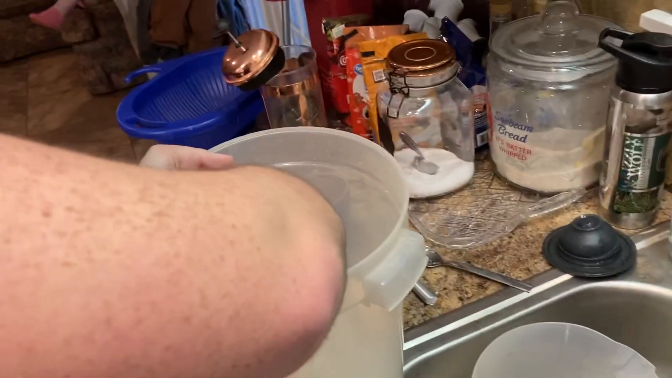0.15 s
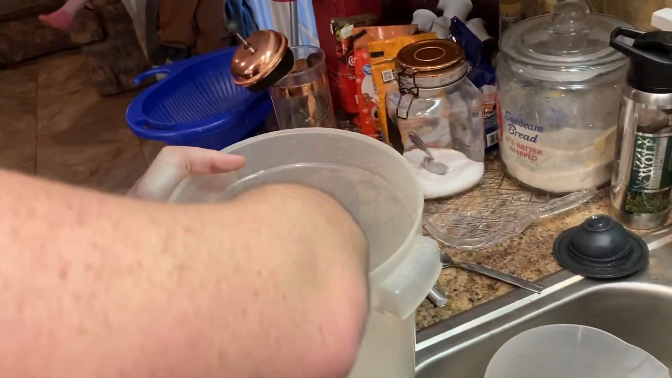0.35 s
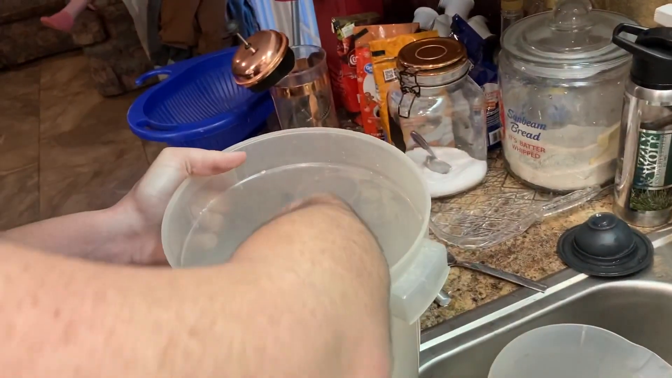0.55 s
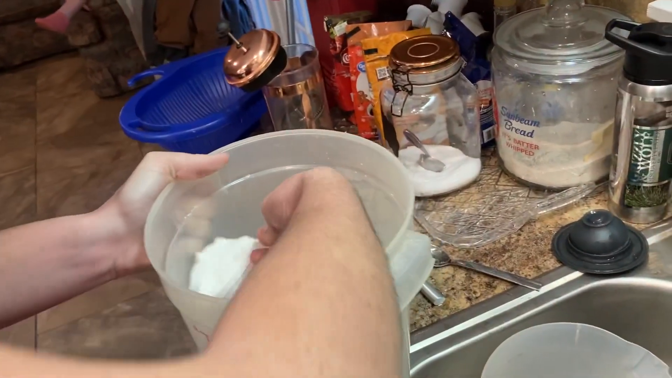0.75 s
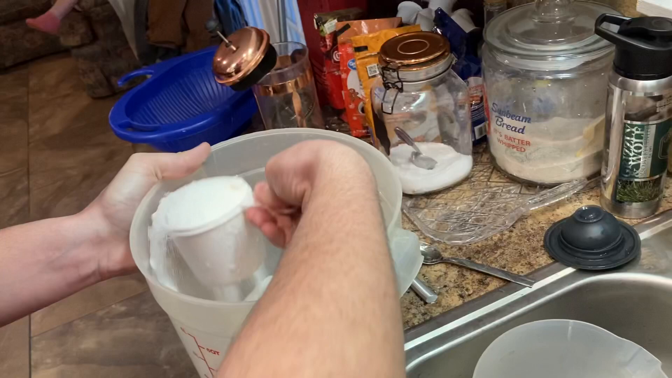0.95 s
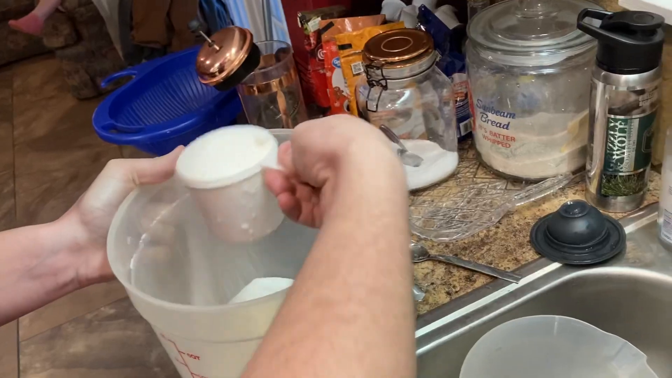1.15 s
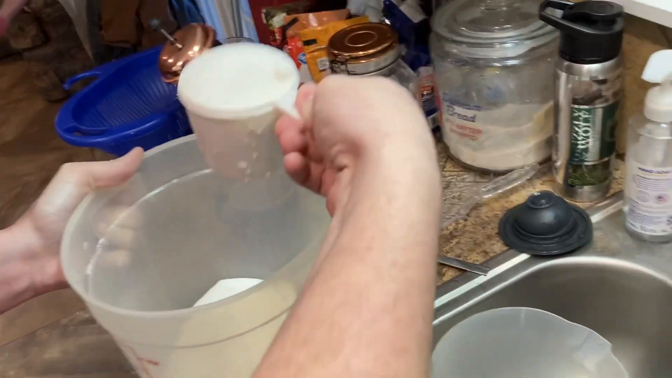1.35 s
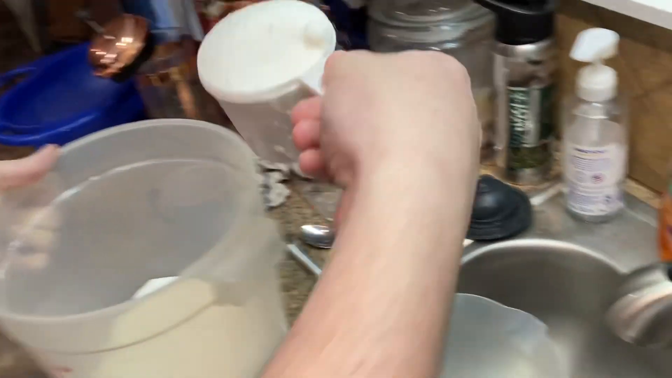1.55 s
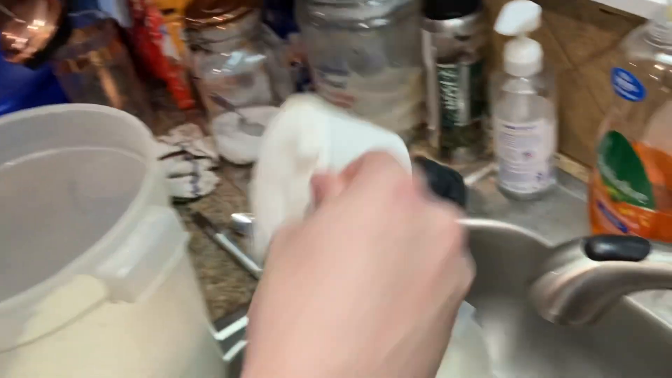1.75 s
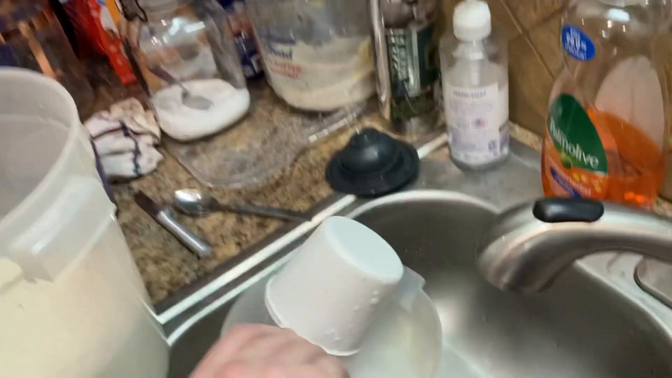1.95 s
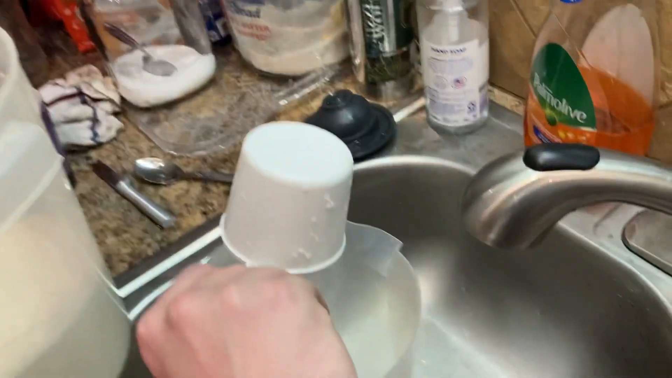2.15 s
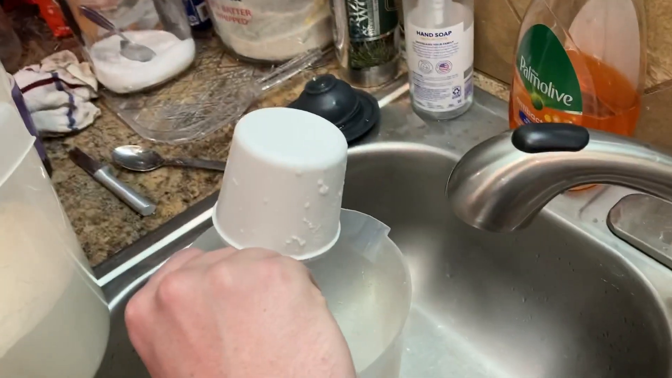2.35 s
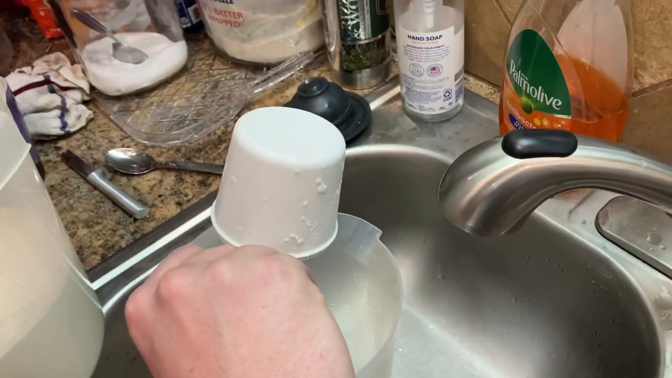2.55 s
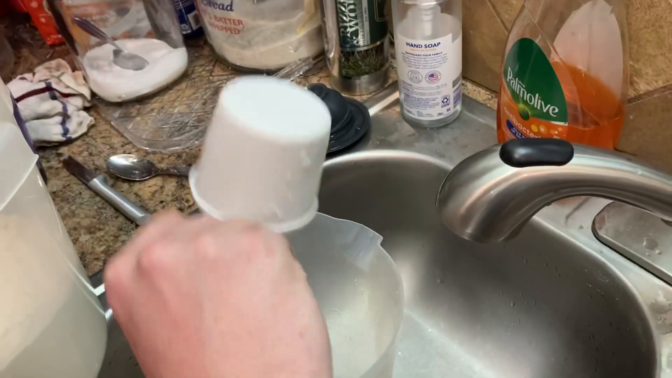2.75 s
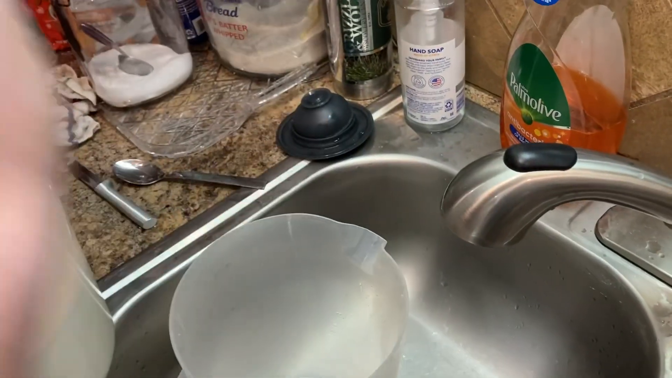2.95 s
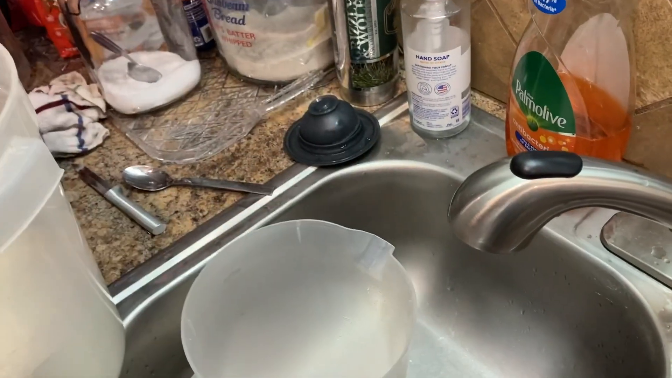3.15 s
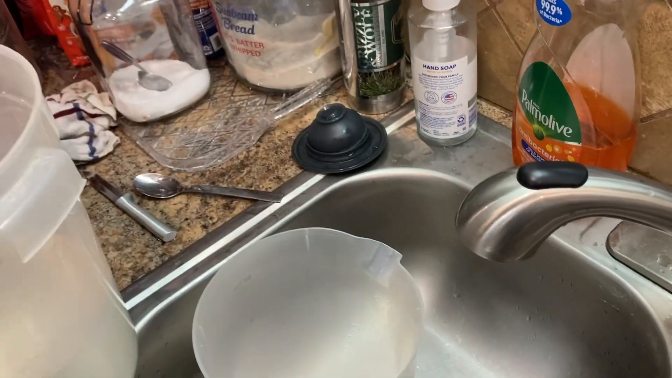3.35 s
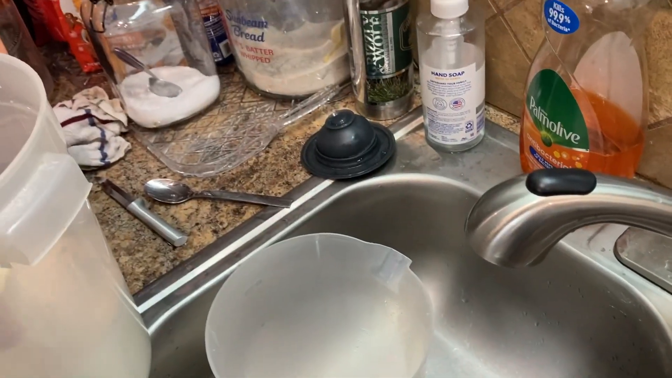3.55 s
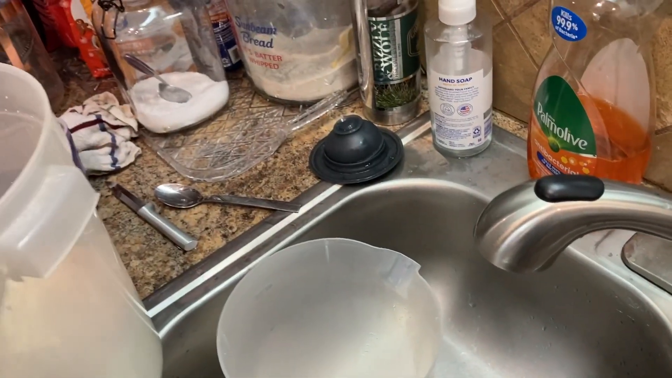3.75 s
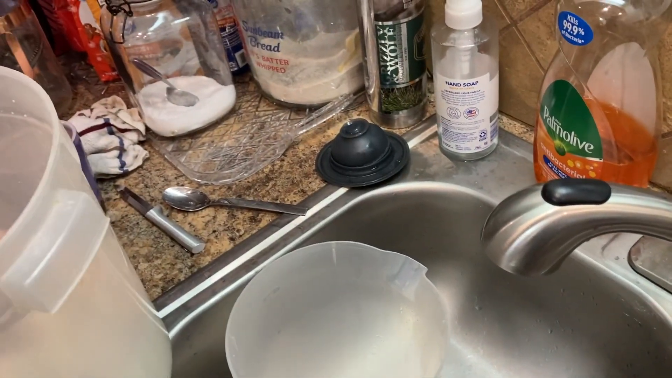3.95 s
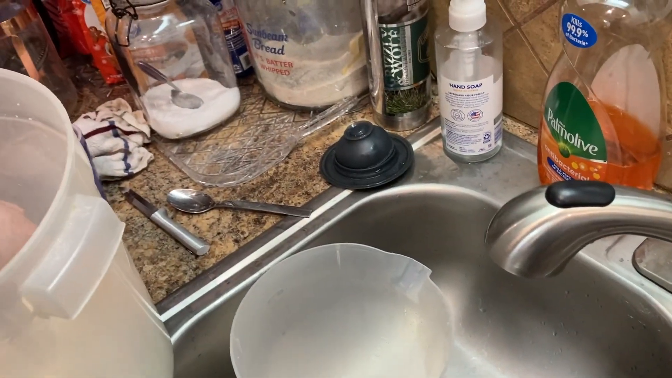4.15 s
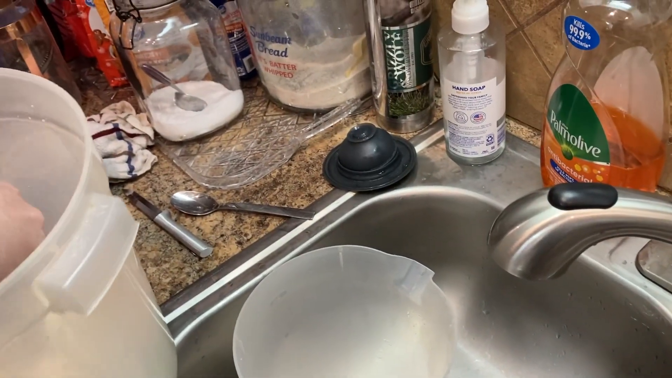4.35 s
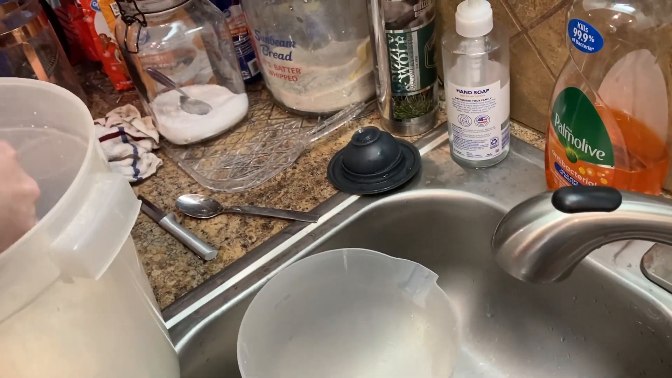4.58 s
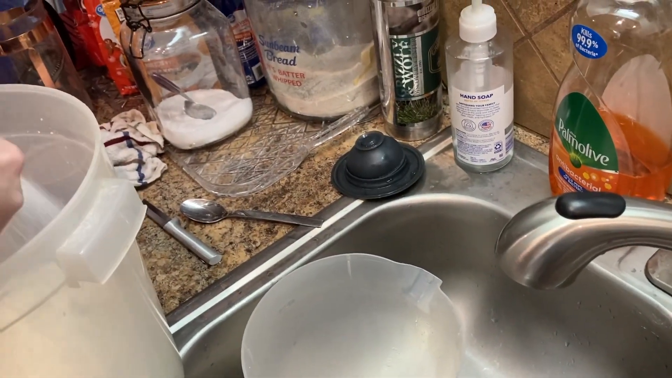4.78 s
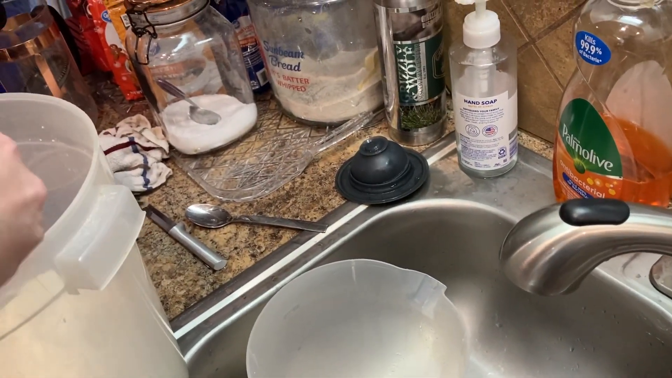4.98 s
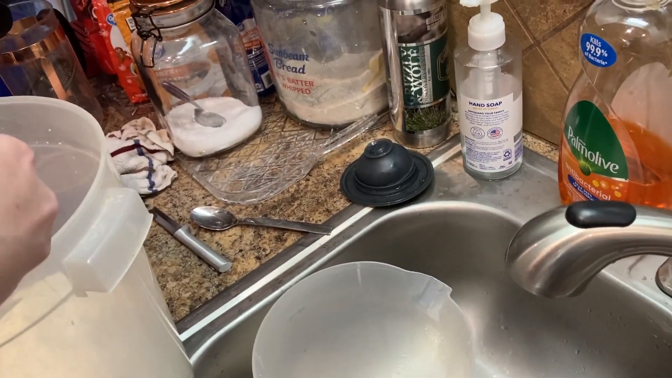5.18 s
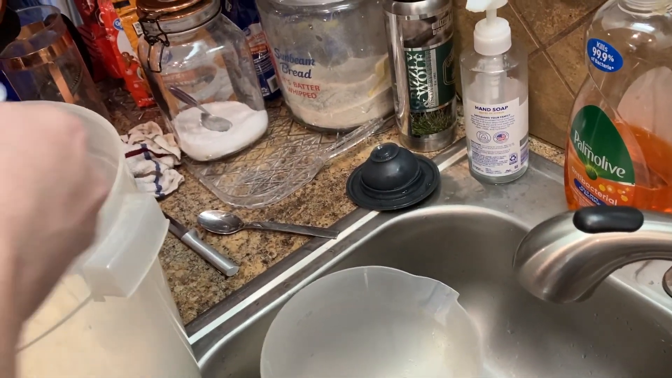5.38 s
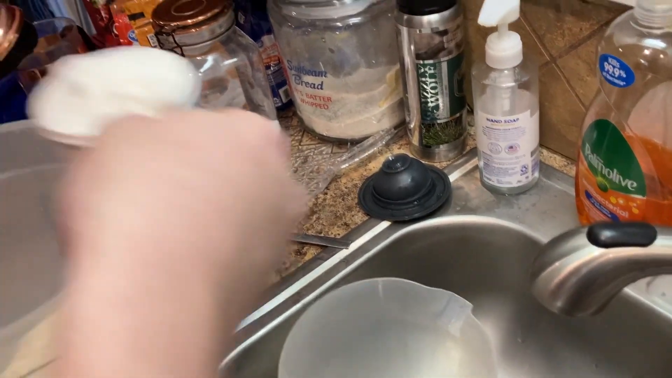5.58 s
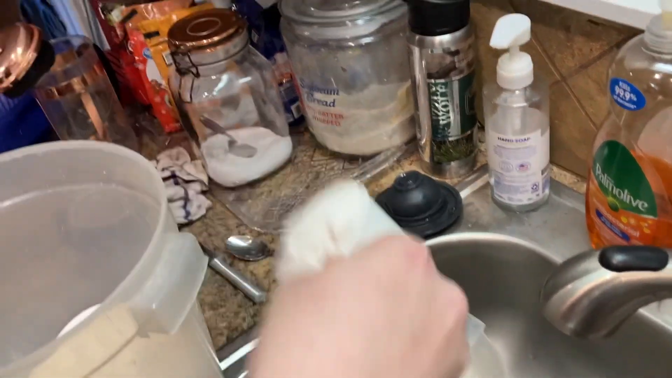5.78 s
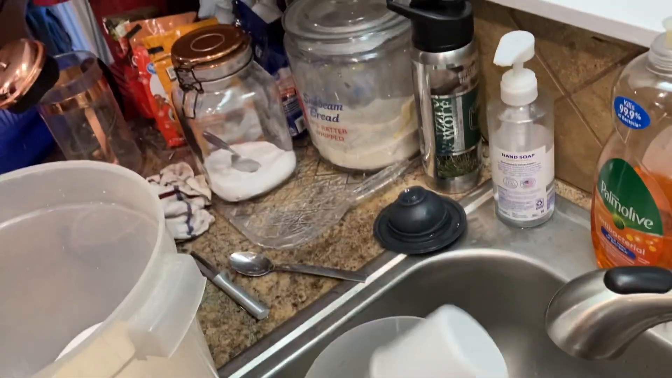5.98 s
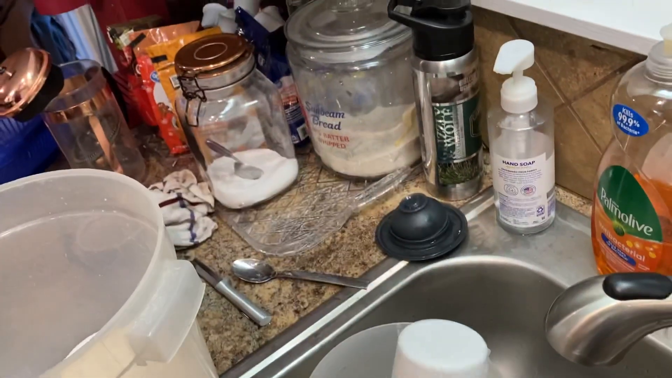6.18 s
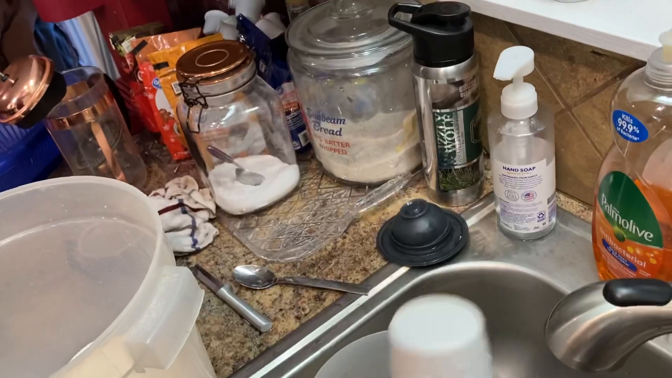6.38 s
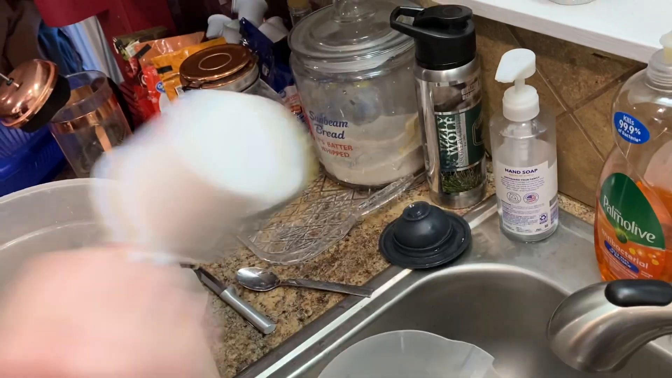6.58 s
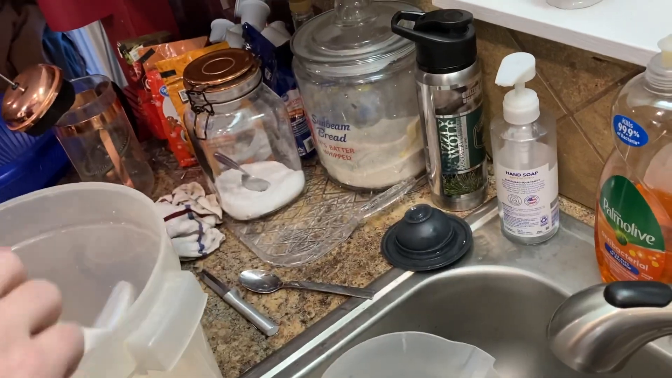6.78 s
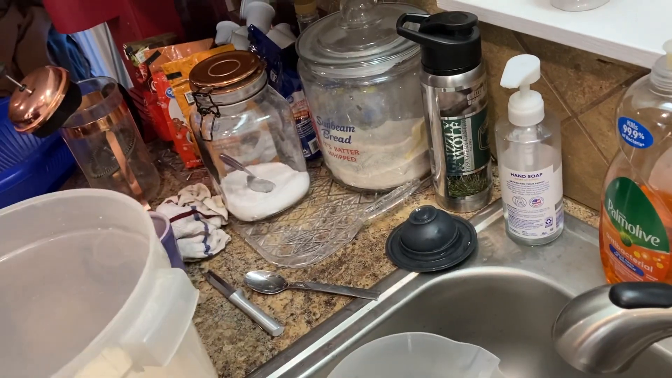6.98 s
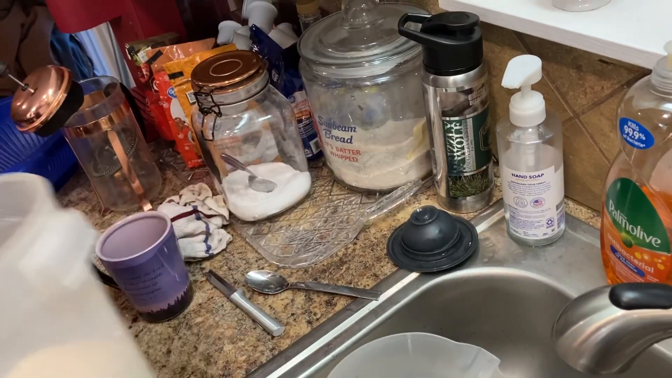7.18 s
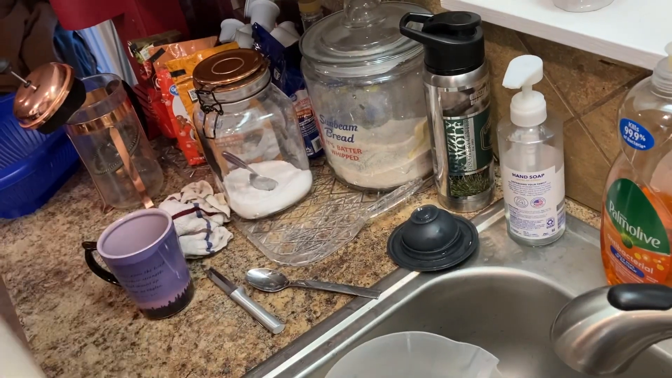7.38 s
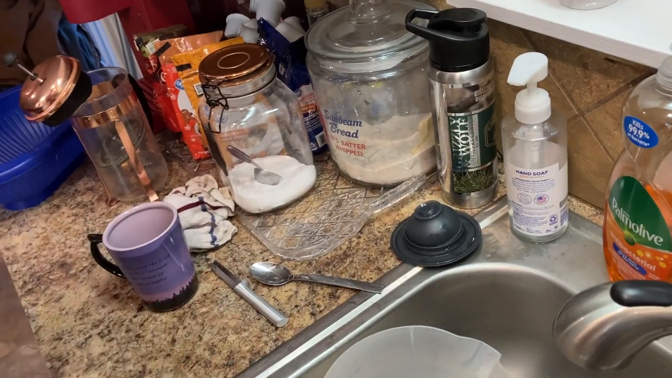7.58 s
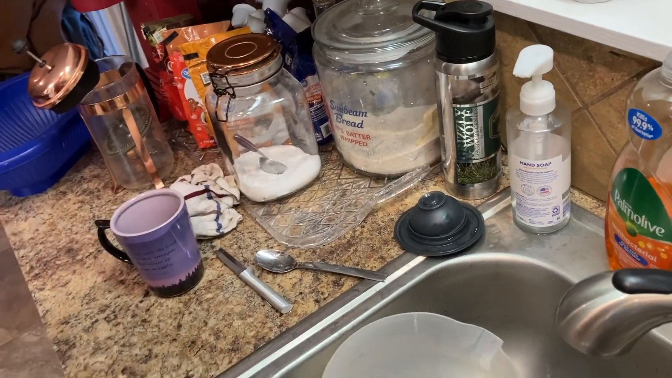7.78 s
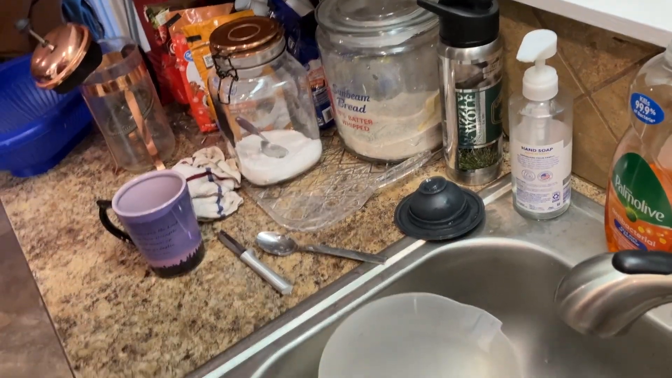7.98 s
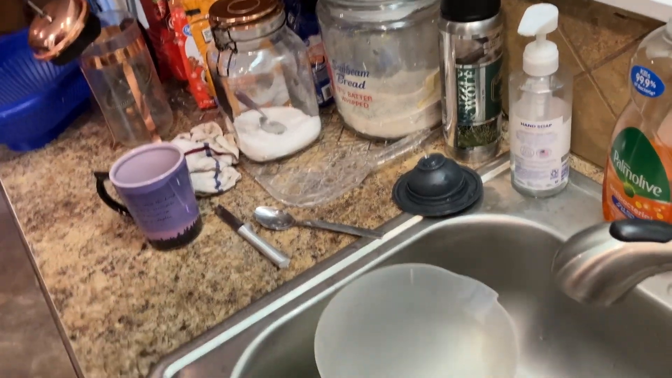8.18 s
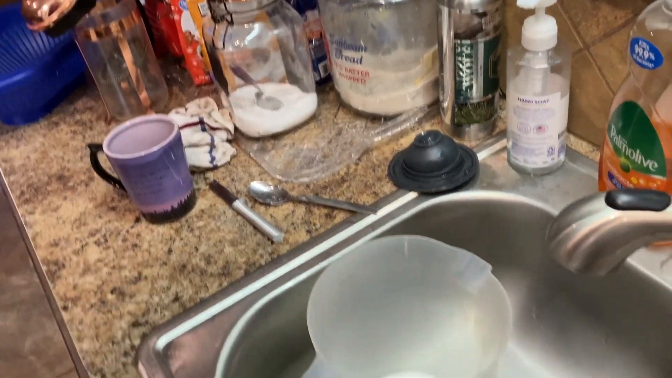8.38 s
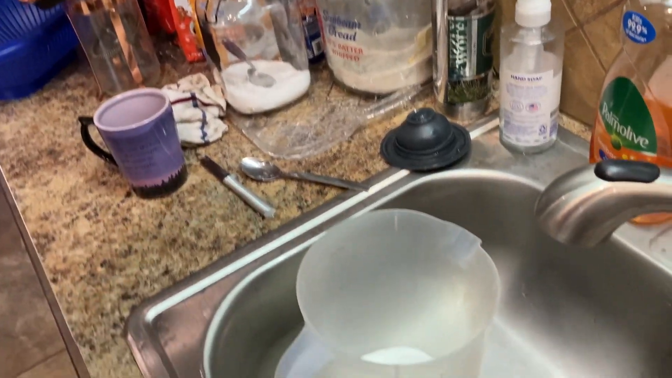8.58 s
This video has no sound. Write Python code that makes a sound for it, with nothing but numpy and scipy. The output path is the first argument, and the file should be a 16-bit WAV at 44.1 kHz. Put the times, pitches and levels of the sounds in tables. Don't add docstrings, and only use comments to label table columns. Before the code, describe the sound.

Granulated sugar hisses and crunches around a plastic cup, first with a bright digging rush, then knocks and a pour. The cup returns to the tub for more scraping, ending in a sharp clack and low thud. After a quiet gap comes a short tip-out, then a loud rapid clatter on hollow plastic. Finally the pitcher is lightly bumped and shaken. Faint refrigerator hum and short kitchen echoes surround the close stereo sound.

```python
import sys
import numpy as np
from scipy import signal
from scipy.fft import rfft, irfft, next_fast_len
from scipy.io import wavfile
from scipy.ndimage import uniform_filter1d, map_coordinates

SR = 44100
rng = np.random.default_rng(int(sys.argv[2]) if len(sys.argv) > 2 else 0)


def wrap_up_sound(samples):
    columns = np.atleast_2d(samples).T
    tamed = np.clip(columns, -1, 1)
    steps = np.round(tamed * 32767).astype(np.int16)
    wavfile.write(sys.argv[1], SR, steps)


def decibels_to_gain(level_db):
    exponent = np.asarray(level_db, float) / 20
    return 10 ** exponent


N = 380578

# t/s, hiss level/dB,
# time to fall 20 dB/s, dullness/dB
SPILLS = [(.004, -56, -0.23, 2), (.484, -28.5, 0.1077, -14), (1.04, -57.5, 0.2, -2),
          (1.201, -34.5, 0.094, -2), (2.21, -38.5, 0.04, -14), (2.43, -32, 0.12, -3),
          (2.856, -72, 0.05, 2.5), (3.0, -76, 1, 7.5), (3.243, -36.5, 0.12, -8), (4.299, -43.5, 0.1, 5.5),
          (4.396, -50, 0.08, 10.5), (4.47, -57, .1, 8), (4.515, -55, .04, 9), (4.568, -49, .035, -20),
          (4.6, -70.5, 0.46, -6), (5.033, -49, .09, -1), (5.975, -42, .15, -4.5), (6.124, -54.5, 0.08, -2),
          (6.642, -41.5, -0.0431, 12.5), (6.703, -46.5, 0.09, 13), (6.814, -56.5, 0.274, 17),
          (6.95, -69, .35, -6),
    (8.222, -56, .25, 4),
]
# peak t/s, hiss level/dB, time to rise 20
# dB/s, time to fall 20 dB/s, dullness/dB
STROKES = [(0.171, -47, 0.09, .16, 2.5), (0.441, -44.5, .17, .1, -4), (0.691, -43.5, 0.23, 0.08, -2.5),
           (.9, -64, 1.2, 0.2, 0.5), (1.46, -74, 0.26, 0.3, 19), (1.59, -58, .1, 0.14, 12.5),
           (1.8, -57, 0.1, 0.56, -16), (1.894, -41.5, 0.0348, 0.1239, -10), (2.046, -49, 0.1, 0.04, 5),
           (2.115, -55.5, .04, 0.07, 0.5), (3.364, -39, 0.0575, 0.11, 3.5),
           (3.45, -39.5, 0.1227, 0.27, -11), (3.58, -47, 0.26, 0.37, -14), (3.74, -43.5, 0.2654, 0.04, -9),
           (3.95, -53, .2, 0.06, 4), (4.14, -44, 0.25, 0.27, -0.5), (4.27, -44, 0.16, 0.1, 0.5),
           (5.45, -78, 0.2, -0.07, 7), (5.54, -80.5, 0.4, 0.6, 10), (5.87, -53.5, 0.04, 0.08, -14),
           (5.96, -49.5, 0.05, 0.11, -20), (6.191, -49.5, -0.06, -0.06, -10), (6.637, -48, .022, -0.02, 14),
           (6.728, -31.5, 0.0373, 0.0479, -10.5), (6.8, -45.5, 0.04, 0.1441, 5),
           (8.33, -52, .12, .1, 5),
    (8.593, -53, .02, .03, 2),
]
# peak t/s, scrape level/dB, time
# to rise 20 dB/s, time to fall 20 dB/s
RUBS = [(.12, -53, 0.18, 0.44), (.51, -43, 0.17, 0.16), (.82, -55.5, 0.3, .2), (1.3, -46.5, .1, 0.3),
        (1.47, -47.5, 0.1, 0.26), (1.598, -43, 0.12, 0.11), (2.221, -43, 0.04, -0.02),
        (2.47, -42, 0.04, 0.15), (3.1, -67.5, -0.5, 2.5), (3.259, -46, 0.01, 0.14),
        (3.56, -37.5, 0.14, 0.19), (3.69, -40.5, 0.07, 0.04), (3.86, -56, 0.16, -0.27),
        (3.95, -49, 0.3, 0.03), (4.15, -48, 0.36, 0.14), (4.41, -41.5, -0.13, 0.02), (4.5, -46, .06, 0.01),
        (5.5, -62, -0.4, -0.56), (6.638, -38, -0.04, -0.17), (6.665, -30, -0.01, -0.0473),
        (6.73, -31.5, -0.0026, -0.0064),
        (7.02, -60, .1, .15),
    (8.33, -38, .1, .08),
    (8.592, -43, .012, .025),
]
RUB_LEVELS = [-21, -9.5, -1]
# level/dB, share of the dullness, lingers longer by (times)
LAYERS = [(1, 0.021, 1.006), (-0.33, 0.64, 0.99), (-5, 0.85, 0.65)]
SPILL_RISE_S, STROKE_ROUND = .011, 1.42

# f/Hz, level per Hz/dB
HISS = [(3000, -23), (4500, -10), (6000, -3.5), (7500, -2), (10000, -0.5), (13000, -11), (16000, -11)]
# f/Hz, width/Hz, level/dB
CRUNCH_MODES = [(1900, 836, -2), (2400, 1160, 1.5), (3072, 2070, -2.5), (4610, 2400, -11.5)]
# f/Hz, width/Hz, level/dB
SCRAPE_MODES = [(278, 130, -3.5), (580, 270, -4.5), (866, 150, 0.5), (1250, 500, -6.5)]

# t/s, level/dB, strongest mode f/Hz, t60/s
ON_CUP = [
    (1.2, -40.5, 2275, 0.4),
    (2.424, -36.5, 2300, 0.3),
    (3.87, -51.5, 2050, 0.97),
]
# t/s, level/dB, strongest mode f/Hz, t60/s
ON_RIM = [
    (.745, -53, 2240, 0.49),
    (1.044, -62, 2230, 0.4),
    (3.51, -50, 2940, 0.67),
    (3.642, -48.5, 2820, .4),
    (3.7, -49, 2450, 0.31),
    (3.97, -50, 2110, .9),
    (4.075, -43, 2120, 0.68),
    (4.17, -46.5, 2220, 0.92),
    (5.032, -47, 2400, 0.088),
]
# t/s, level/dB, strongest mode f/Hz, t60/s
ON_FLOOR = [
    (1.205, -50, 984, 0.29),
    (1.535, -45, 1005, 0.6),
    (2.43, -49, 1050, .36),
    (3.46, -43.5, 900, 0.72),
    (3.53, -38.5, 1012, 0.45),
    (4.45, -54, 900, 0.5),
    (6.645, -34, 903, 0.23),
    (8.237, -42, 1026, 0.34),
    (8.312, -37, 1070, .19),
]
# t/s, level/dB, strongest mode f/Hz, t60/s
ON_WALL = [
    (.12, -48.5, 1546, 1),
    (0.489, -39, 2626, 0.36),
    (.56, -51, 1500, 1),
    (1.535, -43.5, 1815, .45),
    (3.398, -30, 1500, 0.088),
    (5.49, -66, 1503, .45),
    (5.972, -47.5, 1900, 0.1),
]
OTHER_MODES = [
    [.435, 1.49],
    [1.12, 1.3],
    [1.2, 1.2],
    [1.26, .6],
]

# t/s, peak level/dB, ring f/Hz, body re peak/dB, treble re peak/dB
KNOCKS = [(.673, -28.5, 1510, -11.5, 3.5), (1.204, -23, 2400, -26, -1), (1.5366, -42, 2440, -8, -5),
          (1.5978, -45, 1844, -8.5, -8), (2.0668, -26.5, 1630, -39, -2.5), (2.2046, -27.5, 1480, -1, 2),
          (3.236, -31.5, 2610, -26, -5), (3.3577, -33, 2470, -14, -1), (3.4052, -31, 1470, 1, 0),
          (5.04, -55, 2400, -19.5, -4), (4.2935, -17.5, 2490, -12.5, -5), (4.3955, -41, 1566, 9, -8.5),
          (5.9699, -30, 2000, 1, 0), (6.6385, -12.5, 2060, -2.5, -6), (6.6477, -12.5, 2070, -3.5, -5),
          (6.7, -10, 2027, -9, -1), (6.7293, -24.5, 2100, -11, 1.5), (6.8112, -9.5, 2234, -16.5, -2),
          (8.2412, -36.5, 1760, -1.5, -4), (8.375, -41.5, 1830, 8.5, -8), (8.587, -42.5, 1650, -10, -2)]
# t/s, peak level/dB, ring f/Hz
TICKS = [(0.7448, -35, 1640), (0.9018, -43.5, 1740), (1.921, -41, 1900), (1.98, -43, 2630),
         (2.007, -34, 2400), (2.047, -40, 1900), (2.1241, -44, 2220), (3.564, -35, 2880),
         (3.809, -40, 2530), (4.5686, -43, 2140), (5.6988, -65.5, 2340), (5.7695, -54, 1710),
         (5.8565, -48, 2550), (6.001, -41, 2200), (6.123, -39, 2930), (6.1863, -46.5, 1710),
         (6.4172, -58.5, 2260), (6.5689, -49, 3174), (6.5739, -55, 2600)]
# multiple of the ring pitch, level/dB
CUP_OVERTONES = [(0.679, -14), (1, -3.5), (1.36, -16.5), (1.73, -13.5), (2.2, -12.5), (2.7, -16.5),
                 (3.25, -15)]
KNOCK_T60, TICK_T60 = 0.053, .04
TICK_BODY_DB, TICK_TREBLE_DB, TICK_RING_DB, KNOCK_RING_DB = -20, -1.5, -9, -3
SNAP_DB, SNAP_T60 = 8, .006
TREBLE_T60_SHARE = .65
CUP_WANDER_HZ = 200

# (f/Hz, width/Hz, level/dB)
JOLTS = [
    (.483, -35, 0.36, [(940, 46, -9), (1406, 84, -9), (2700, 70, -6), (3230, 46, -13), (3840, 24, 3), (4810, 53, -7), (6030, 95, -5.5), (6500, 52, -3), (7240, 100, 0.5), (7540, 49, -11)]),
    (.672, -41, 0.056, [(1020, 73, 0), (5940, 150, -5), (6500, 140, 2), (7450, 170, -8)]),
    (.68, -46.5, 0.25, [(1584, 56, 1.5), (2730, 33, 2.5), (3780, 25, -9)]),
    (1.201, -38, .45, [(1051, 126, -1.5), (1910, 33, -6.5), (2296, 54, -1.5), (3550, 110, 0), (3940, 46, -14), (4250, 33, -10)]),
         (6.816, -44, 0.35, [(2150, 250, -1.5), (2450, 250, 0), (2752, 250, -5)]),
    (8.236, -41, 0.27, [(760, 98, -6), (1090, 67, 2), (1750, 72, -4.5), (2095, 120, -8), (2900, 90, -9)]),
    (8.312, -36, .18, [(777, 95, -3), (1097, 80, 1), (1597, 100, -4), (2000, 110, -6)]),
    (8.362, -43, 0.15, [(1116, 88, 2), (1593, 120, -6), (2550, 120, -10)]),
    (1.036, -55.5, .4, [(2300, 35, -2), (5300, 200, -2), (5780, 200, -1), (6250, 200, -8)]),
    (2.424, -41, 0.53, [(974, 30, -2.5), (1124, 21, -4.5), (1670, 32, -14.5), (2330, 69, -0.5), (3340, 44, -7), (4350, 110, -4), (4970, 30, -8.5)]),
    (3.25, -45, 0.29, [(967, 47, 0), (1980, 84, -17), (2530, 53, -4)]),
    (3.357, -34.5, 0.23, [(995, 32, 0), (1660, 26, -2), (1900, 22, -4), (2490, 25, -2.5), (2860, 26, -13), (3640, 48, -20)]),
    (5.033, -50, 0.35, [(2316, 62, -1), (2520, 37, -4), (2950, 43, -17), (4170, 53, -24.5)]),
]
# (f/Hz, width/Hz, level/dB)
BLOWS = [
    (3.402, -29.5, 0.11, [(917, 110, -3), (1176, 57, -3), (1510, 65, -2), (1990, 86, -7.5), (2380, 60, -9), (2500, 67, -4.5)]),
    (6.639, -19.5, .1, [(340, 35, -2), (931, 39, 1.5), (1250, 48, -7), (2065, 33, -4.5), (2596, 110, -10), (3116, 48, -7.5), (3544, 32, -11.5)]),
    (6.649, -20.5, 0.07, [(919, 44, -0.5), (1250, 55, -4), (1445, 46, -7), (2046, 25, -4), (2350, 19, -10), (3110, 29, -11.5), (3420, 120, -11)]),
    (6.7, -21.5, .06, [(533, 93, 0), (916, 88, -4.5), (1860, 91, -6.5), (2400, 87, -3.5), (3390, 130, -2), (4010, 210, -5.5), (4470, 280, -8.5)]),
    (6.811, -11.5, 0.042, [(1532, 140, -7), (2208, 220, 2), (3210, 130, -11.5), (3800, 120, -8.5), (4380, 130, -13), (4830, 94, -10.5), (5505, 80, -17.5), (5795, 96, -13)]),
    (2.0658, -33, 0.047, [(1590, 120, 0), (1920, 91, -7), (3260, 58, -3), (4060, 105, 3), (4760, 87, -5)]),
    (4.2934, -24.5, 0.046, [(980, 81, -4), (1470, 170, -2.5), (2010, 88, -2), (2490, 70, 2.5), (3690, 73, -9)]),
    (8.587, -39, 0.063, [(820, 95, -5), (1075, 95, 2), (1643, 100, -2), (2580, 190, -11)]),
]
RING_WANDER, RING_FLUTTER_DB = 1.1, 4
RING_RISE_S = 0.0036

# t/s, peak level/dB, f/Hz, wall modes re peak/dB
THUDS = [(0.501, -36, 88.5, 1.5), (.535, -24, 113.6, 1.5), (0.586, -42, 64.6, 9), (1.91, -29.5, 115, -11),
         (1.95, -24, 90, -14.5), (2.038, -32.5, 69.5, -30), (2.158, -33.5, 110, -2), (2.27, -38, 130, -9),
         (2.319, -40, 111.5, -14), (3.236, -31, 324, -14), (3.711, -32.5, 340, -5),
         (4.404, -17, 108.5, -0.5), (4.4, -28, 240, -5), (4.484, -37.5, 90, 3.5), (4.543, -26, 109.6, -10),
         (5.985, -32, 116, -18), (6.008, -31, 110, -1), (6.03, -35, 70.7, -12), (6.643, -23, 112, -13.5),
         (6.644, -36.5, 340, -18.5), (6.698, -29, 108, -0.5), (6.699, -34, 420, -21), (6.815, -29, 330, -8),
         (6.816, -34, 105, -9), (8.243, -36, 150, 2), (8.286, -35.5, 106, -19), (8.361, -34.5, 105, -13),
         (8.382, -35, 170, 1), (8.408, -31, 112, 0)]
# f/Hz, level/dB, t60/s
THUD_WALL = [(224, -0.5, .16), (388, -8, 0.058), (615, -19, 0.14), (967, -20.5, 0.11)]
LOAD_HZ, LOAD_S, LOAD_SAG = 100, 0.04, 0.33

# f/Hz, width/Hz, rms level/dB
HUM = [(63, 3.5, -58), (118.65, 3.2, -53.5), (240, 13, -55), (377, 9.8, -71.5), (450, 14, -70.5)]
# f/Hz, level per Hz/dB
RUMBLE = [(20, -36.5), (39, -18.5), (50, 0), (80, -5.5), (110, -3), (165, -21.5), (210, -13.5), (320, -12),
          (500, -21), (800, -22.5)]
# f/Hz, level per Hz/dB
AIR = [(1300, -29), (2000, -35), (3200, -41), (5000, -50), (10000, -56), (16000, -63)]
AIR_DB = -46
# f/Hz, likeness (0 to 1)
ALIKE = [(60, 0.8), (300, 0.91), (600, 0.17), (1200, 0.036), (6000, 0.066)]
# f/Hz, likeness (0 to 1)
NEAR = [(60, 0.66), (300, 0.99), (600, 0.71), (1500, 0.25), (3000, 0.066), (6000, 0.1925)]
# f/Hz, t60/s
KITCHEN = [(150, .4), (2000, .5), (6000, .36), (14000, .2)]
KITCHEN_DULL_HZ = 6000
RING_ROOM_DB = -20
PORT_LAG = 14
LAG_FROM_HZ = 570
ONE_PORT_HZ = 6700


def unit(x):
    return x / np.sqrt(np.mean(x ** 2) + 1e-20)


def along(points, hz):
    f, v = np.transpose(points)
    return np.interp(np.log(hz + 1), np.log(f), v)


def filtered(x, response):
    n = x.shape[-1]
    m = next_fast_len(n + 4096)
    return irfft(rfft(x, m) * response(np.fft.rfftfreq(m, 1 / SR)), m)[..., :n]


def resonances(modes):
    def response(f):
        return sum((-1) ** k * decibels_to_gain(db) * 1j * f * w / (c * c - f * f + 1j * f * w)
                   for k, (c, w, db) in enumerate(modes))
    return response


def wobble(rate):
    knots = rng.standard_normal(int(N * rate / SR) + 4)
    return map_coordinates(knots, [np.arange(N) * rate / SR])


def paired(two, alike):
    def shares(hz):
        turn = np.arccos(np.clip(along(alike, hz), 0, 1)) / 2
        return np.array([np.cos(turn), np.sin(turn)])
    mid, side = filtered(two, shares)
    return np.array([mid + side, mid - side])


def add(track, s, piece):
    i = round(s * SR)
    track[:, i:i + piece.shape[1]] += piece[:, :track.shape[1] - i]


def grains(spread_db, clump_db, patchy_db):
    uneven_db = spread_db * np.minimum(rng.exponential(size=N), 4)
    size = decibels_to_gain(uneven_db + clump_db * (wobble(90) + wobble(25)))
    z = signal.stft(size * rng.standard_normal((2, N)), nperseg=512)[2]
    field = uniform_filter1d(rng.standard_normal(z.shape[1:]), size=3, axis=0)
    field = uniform_filter1d(field, size=14, axis=1)
    return signal.istft(z * decibels_to_gain(patchy_db * unit(field)), nperseg=512)[1][:, :N]


def sugar():
    power, t = np.zeros((3, 2 * SR + N)), np.arange(-SR, SR) / SR
    layer_db, share, linger = np.transpose(LAYERS)[..., None]
    moves = [(s, db, SPILL_RISE_S, fall, dull, 1) for s, db, fall, dull in SPILLS]
    moves += [(*row, STROKE_ROUND) for row in STROKES]
    for s, db, rise, fall, dull_db, roundness in moves:
        away = np.where(t < 0, -t / max(rise, .002), t / (linger * max(fall, .01)))
        add(power, s, decibels_to_gain(db + layer_db + share * dull_db - 20 * away ** roundness) ** 2)
    for s, db, rise, fall in RUBS:
        away = np.where(t < 0, -t / max(rise, .002), t / max(fall, .01))
        add(power, s, decibels_to_gain(db + np.c_[RUB_LEVELS] - 20 * away ** STROKE_ROUND) ** 2)
    gains = np.sqrt(power[:, SR:SR + N])

    def crunchy(f):
        return resonances(CRUNCH_MODES)(f) / (1 + (1500 / (f + 1)) ** 6)
    hiss = filtered(grains(spread_db=3, clump_db=1.5, patchy_db=2.5), lambda f: decibels_to_gain(along(HISS, f)))
    crunch = filtered(grains(spread_db=2, clump_db=3, patchy_db=2.0), crunchy)
    scrape = filtered(grains(spread_db=2.5, clump_db=2.0, patchy_db=3.0), resonances(SCRAPE_MODES))
    return gains[0] * unit(hiss) + gains[1] * unit(crunch) + gains[2] * unit(scrape)


def slumps():
    out, t = np.zeros((2, N)), np.arange(SR // 2) / SR
    for others, slides in zip(OTHER_MODES, [ON_CUP, ON_RIM, ON_FLOOR, ON_WALL]):
        for s, db, strongest_hz, t60 in slides:
            hz = strongest_hz * np.array([1, *others])
            modes = resonances([(f, 80 + .012 * f, -2.2 * k) for k, f in enumerate(hz)])
            noise = rng.standard_normal((2, len(t)))
            sing = filtered(noise, lambda f: modes(f) * abs(modes(f)) ** .5)
            add(out, s, decibels_to_gain(db - 60 * t / t60) * (1 - np.exp(-t / 0.0016)) * unit(sing))
    return out


def clacks():
    out, t = np.zeros((2, N)), np.arange(SR // 8) / SR

    def crack(t60):
        return (decibels_to_gain(SNAP_DB - 60 * t / SNAP_T60) + decibels_to_gain(-60 * t / t60)) * rng.standard_normal((2, len(t)))
    hits = [(*row, KNOCK_RING_DB, KNOCK_T60) for row in KNOCKS]
    hits += [(*row, TICK_BODY_DB, TICK_TREBLE_DB, TICK_RING_DB, TICK_T60) for row in TICKS]
    for s, db, hz, body_db, treble_db, ring_db, t60 in hits:
        cup_mode = resonances([(hz, 1400, 0)])
        bright = filtered(crack(t60), lambda f: cup_mode(f) * (1j * f / (1j * f + 700)) ** 2)
        bright += filtered(crack(TREBLE_T60_SHARE * t60), resonances([(6500, 4900, treble_db)]))
        walk = np.cumsum(rng.standard_normal(len(t))) * np.sqrt(2 * np.pi * CUP_WANDER_HZ / SR)
        ring = np.zeros(len(t))
        for k, level in CUP_OVERTONES:
            fade_db = 60 * t * np.sqrt(k) / min(.8 * t60, .034)
            size = decibels_to_gain(ring_db + level + rng.normal(0, 4.3) - fade_db)
            ring += size * np.sin(k * (2 * np.pi * hz * t + walk))
        body = filtered(decibels_to_gain(-60 * t / t60) * rng.standard_normal((2, len(t))),
                        resonances([(445.7, 600, 7.8), (900, 430, 7.5), (1250, 1300, 6.5)]))
        sharp = bright + [[np.sqrt(2)], [0]] * ring
        add(out, s, decibels_to_gain(db + 2.5) * sharp / abs(sharp).max() + decibels_to_gain(db + body_db - 5.0) * body)
    return out


def rings():
    out, t = np.zeros((2, N)), np.arange(SR // 2) / SR
    for s, db, t60, modes in JOLTS + BLOWS:
        hz, width, level_db = np.transpose(modes)[..., None]
        steps = rng.standard_normal((len(hz), len(t)))
        walk = np.cumsum(steps, axis=1) * np.sqrt(2 * np.pi * RING_WANDER * width / SR)
        knots = rng.standard_normal((len(hz), 40))
        flutter = np.array([map_coordinates(k, [t * 70]) for k in knots])
        flutter_db = RING_FLUTTER_DB * flutter * np.minimum(t60 / 0.53, 1)
        fade_db = 60 * t * (hz / 2000) ** 0.1 / t60
        size = decibels_to_gain(db + level_db + flutter_db - fade_db) * (1 - np.exp(-t / RING_RISE_S))
        turn = 2 * np.pi * hz * t + walk
        half_lag = np.pi * hz * PORT_LAG / SR * hz ** 2 / (hz ** 2 + LAG_FROM_HZ ** 2)
        lead = np.clip(np.tan(half_lag), -1.1, 1.1)
        mid = (size * np.sin(turn)).sum(0)
        side = (lead * size * np.cos(turn)).sum(0)
        add(out, s, np.array([mid + side, mid - side]))
    return out


def thuds():
    out, t = np.zeros((2, N)), np.arange(SR // 3) / SR
    for s, db, hz, wall_db in THUDS:
        sag, length = LOAD_SAG * LOAD_HZ / hz, LOAD_S * (LOAD_HZ / hz) ** 1.1
        turn = 2 * np.pi * hz * ((1 - 0.55 * sag) * t + sag * 0.029 * (1 - np.exp(-t / 0.019)))
        turn += 0.82 * map_coordinates(rng.standard_normal(size=40), [t * 90])
        shape = (1 - np.exp(-t / 0.022)) * np.exp(-(t / max(length, .01)) ** 2)
        wall = np.zeros(len(t))
        for f, level, t60 in THUD_WALL:
            size = decibels_to_gain(level + rng.normal(0, 0.44) - 60 * t / t60)
            wall += size * np.sin(2 * np.pi * f * t + rng.uniform(0, 2 * np.pi))
        tone = shape / shape.max() * np.sin(turn) + decibels_to_gain(wall_db) * (1 - np.exp(-t / 0.0063)) * wall
        add(out, s - .004, decibels_to_gain(db) * tone * decibels_to_gain([[-1.1], [1.1]]))
    return out


def fridge():
    def lines(f):
        return sum(decibels_to_gain(db) / np.sqrt(w) / (1 + ((f - hz) / w) ** 2) for hz, w, db in HUM)
    hum = np.sqrt(SR / np.pi) * filtered(rng.standard_normal((2, N)), lines)
    air = unit(filtered(rng.standard_normal((2, N)), lambda f: decibels_to_gain(along(RUMBLE + AIR, f))))
    air_level = decibels_to_gain(AIR_DB - 5.5 + 0.41 * wobble(0.83))
    return paired(hum + air_level * air, ALIKE) * decibels_to_gain([[-.9], [.9]])


def kitchen(x):
    hz, t, z = signal.stft(rng.standard_normal((2, SR // 2)), SR, nperseg=256)
    fade = decibels_to_gain(-60 * t / along(KITCHEN, hz)[:, None])
    dull = 1 + (hz[:, None] / KITCHEN_DULL_HZ) ** 2
    tail = signal.istft(z * fade / dull, SR, nperseg=256)[1]
    return signal.fftconvolve(x, tail / np.linalg.norm(tail[0]), axes=1)[:, :N]


def scene():
    def late(f):
        return np.exp(-2j * np.pi * f * PORT_LAG / SR * f ** 2 / (f ** 2 + LAG_FROM_HZ ** 2))
    left, right = paired(sugar() + slumps() + clacks(), NEAR)
    grainy = np.array([left, filtered(right, late)])
    ringing = rings()
    near = grainy + ringing
    near = np.where(np.arange(N) < 8 * SR, near, near[::-1])
    low = thuds()
    echoes = kitchen(decibels_to_gain(-14.5) * grainy + decibels_to_gain(RING_ROOM_DB) * ringing)
    low_echo = decibels_to_gain(-16) * kitchen(low[:1])[0]
    return near + echoes + low + low_echo + fridge()


def low_pass(x):
    return signal.sosfilt(signal.butter(12, 17000, fs=SR, output="sos"), x)


def record(dry):
    def upper(f):
        return 1 / (1 + (ONE_PORT_HZ / (f + 1)) ** 24)

    def lag(f):
        turn = np.pi * (f - 6830) / 2300
        return np.exp(.5j * (turn - .18 * np.sin(2 * turn)) * np.array([[-1], [1]]))

    def edge(f):
        return .03 + .97 / (1 + (f / 15700) ** 60)
    lower_part = filtered(dry, lambda f: 1 - upper(f))
    treble = filtered(dry[0], lambda f: upper(f) * lag(f) * edge(f))
    return low_pass(lower_part + treble)


dry = scene()
out = record(dry)
wrap_up_sound(out)
```